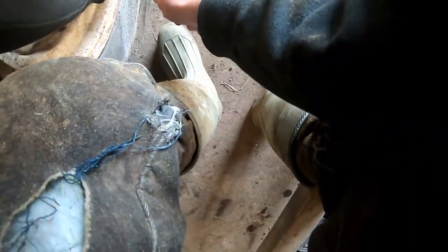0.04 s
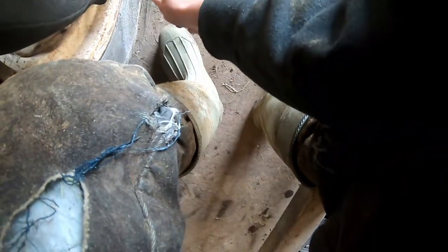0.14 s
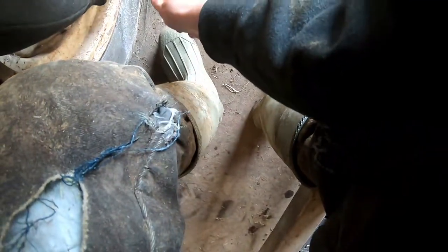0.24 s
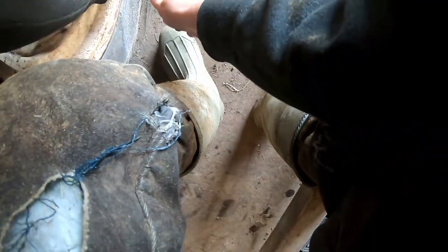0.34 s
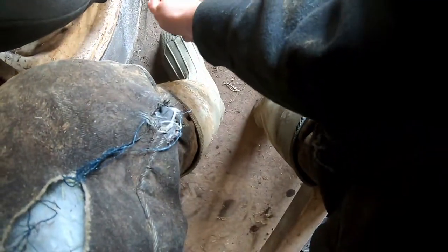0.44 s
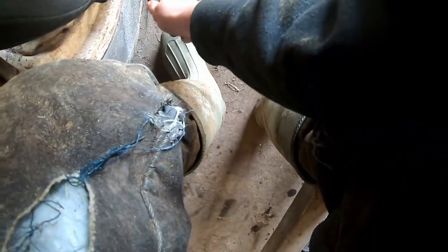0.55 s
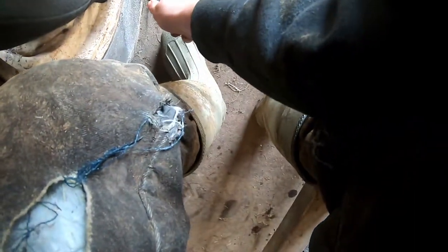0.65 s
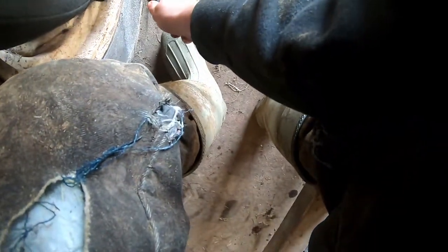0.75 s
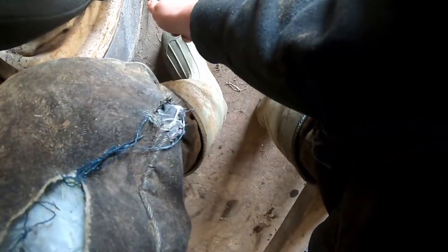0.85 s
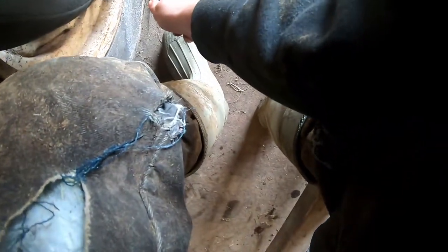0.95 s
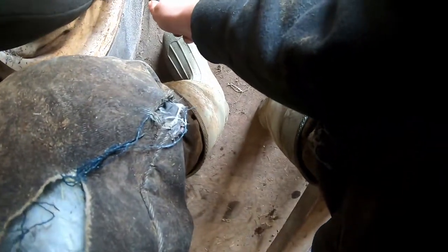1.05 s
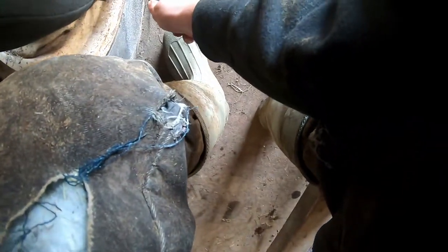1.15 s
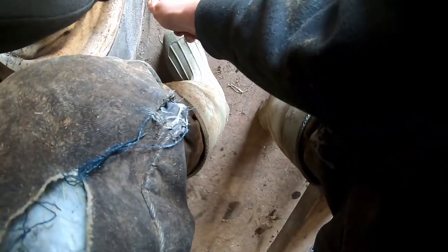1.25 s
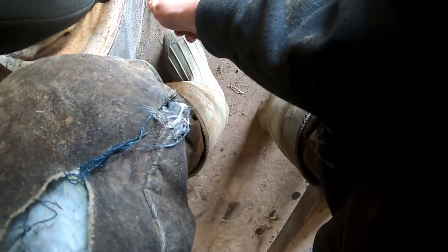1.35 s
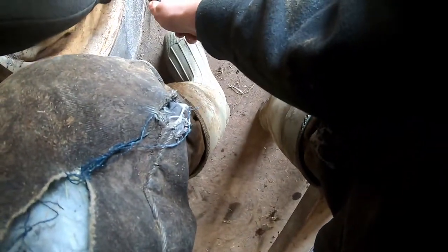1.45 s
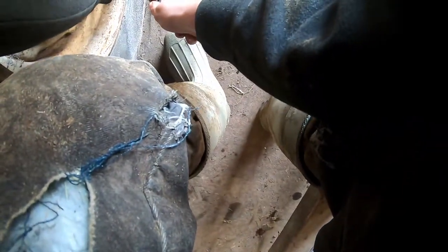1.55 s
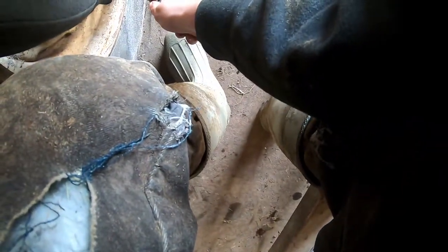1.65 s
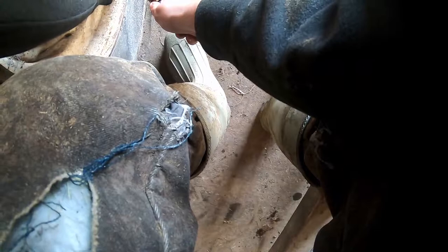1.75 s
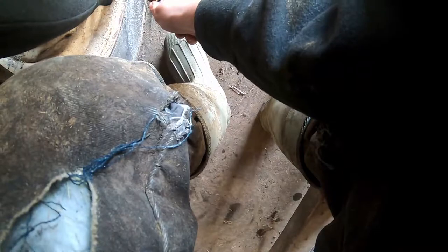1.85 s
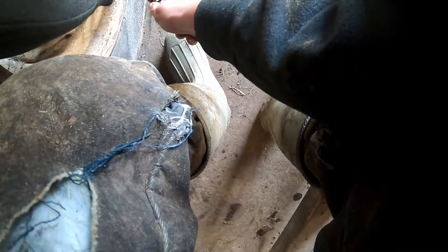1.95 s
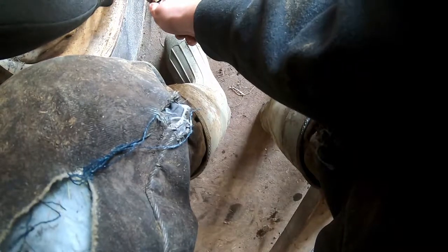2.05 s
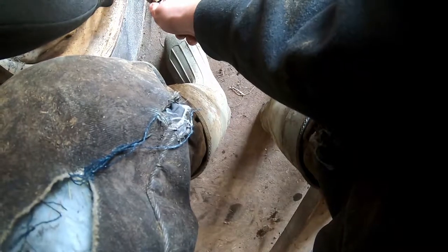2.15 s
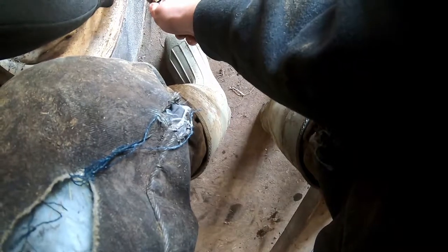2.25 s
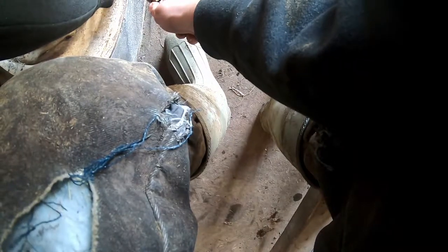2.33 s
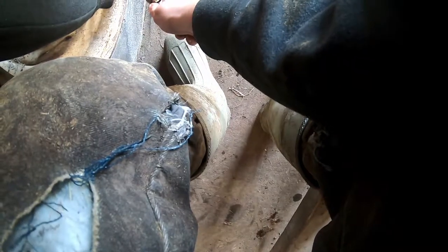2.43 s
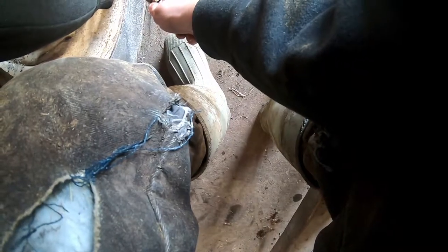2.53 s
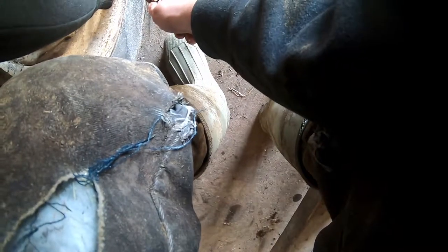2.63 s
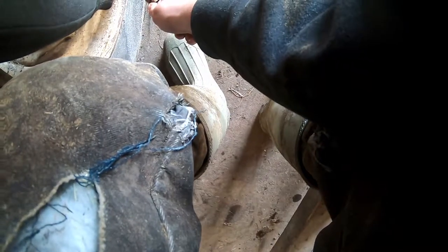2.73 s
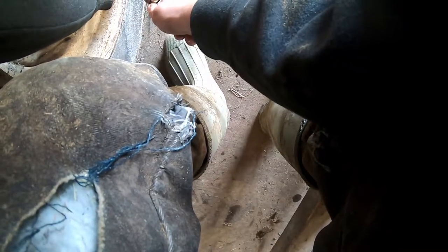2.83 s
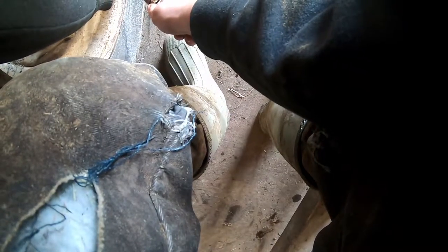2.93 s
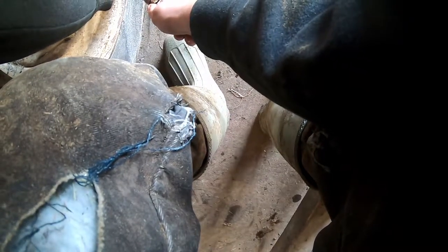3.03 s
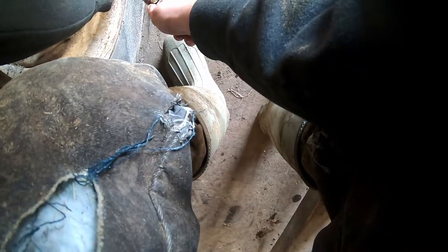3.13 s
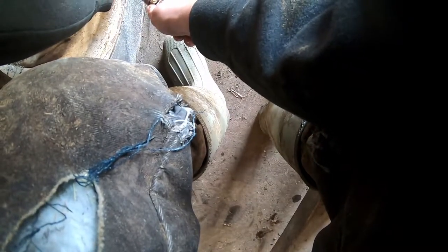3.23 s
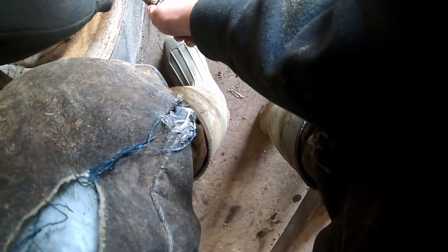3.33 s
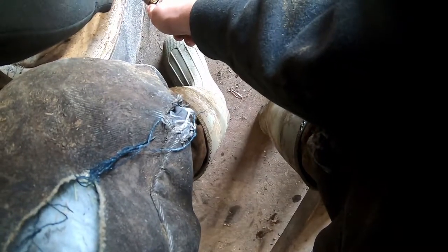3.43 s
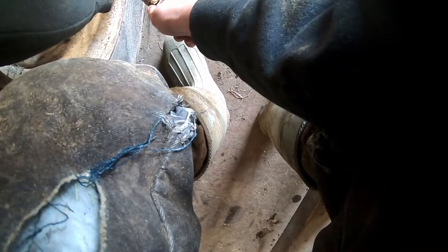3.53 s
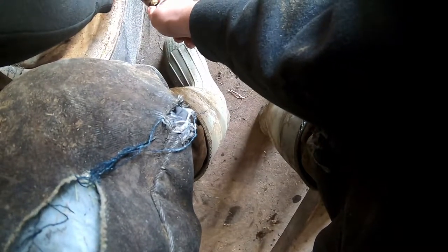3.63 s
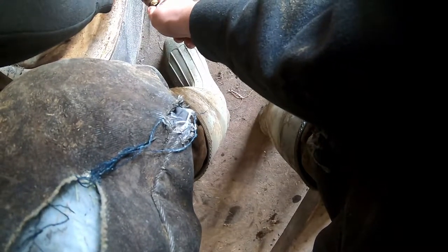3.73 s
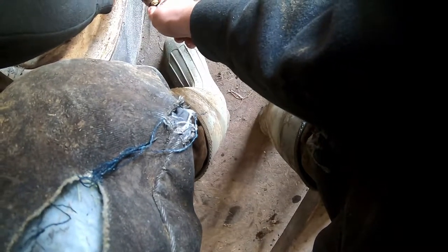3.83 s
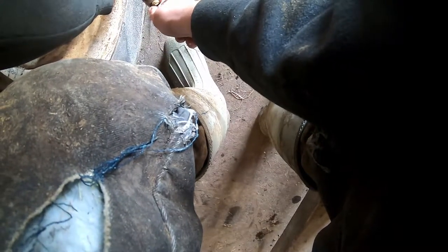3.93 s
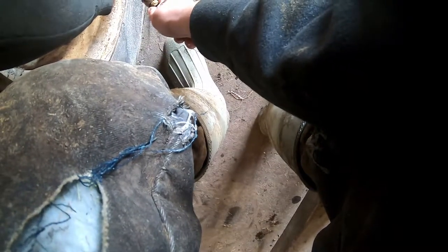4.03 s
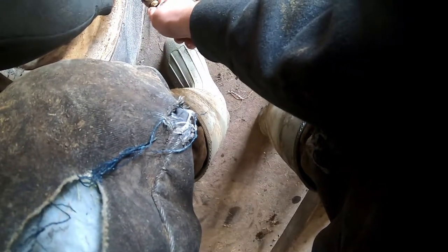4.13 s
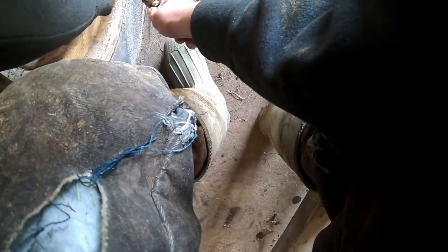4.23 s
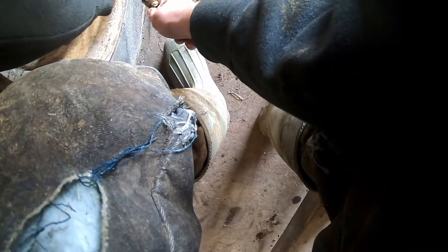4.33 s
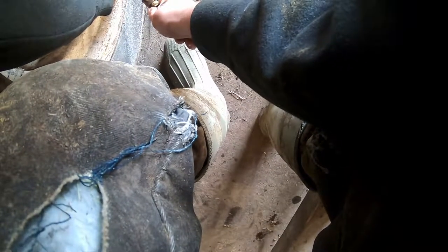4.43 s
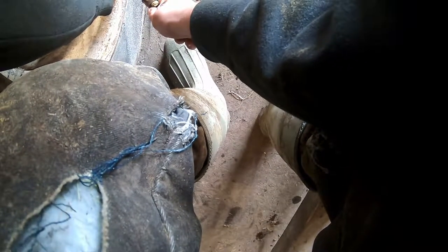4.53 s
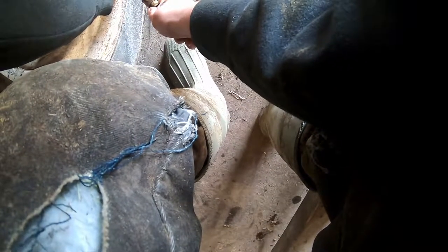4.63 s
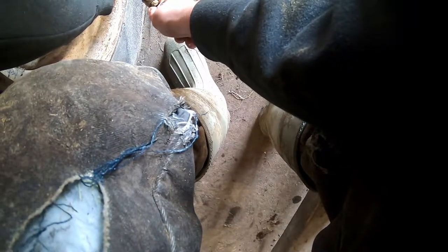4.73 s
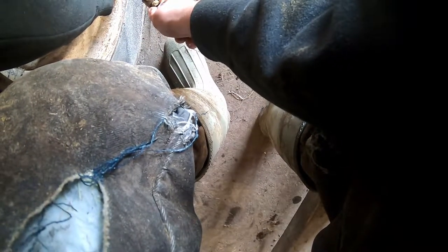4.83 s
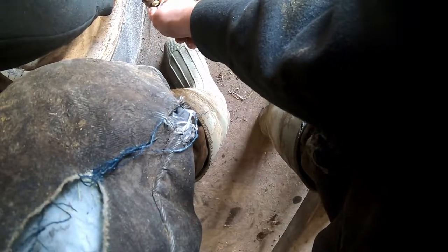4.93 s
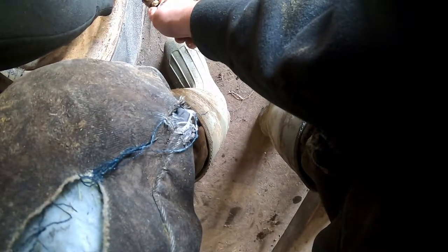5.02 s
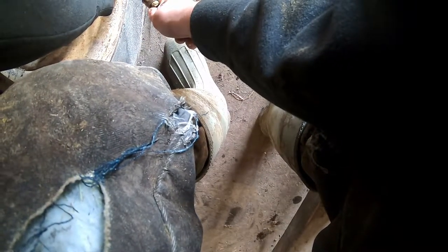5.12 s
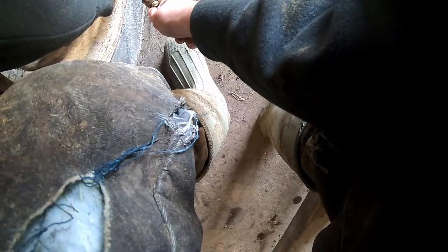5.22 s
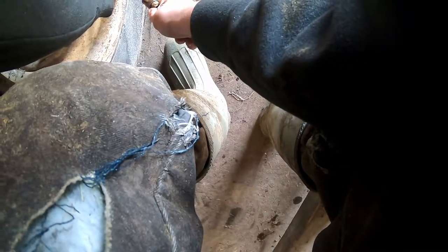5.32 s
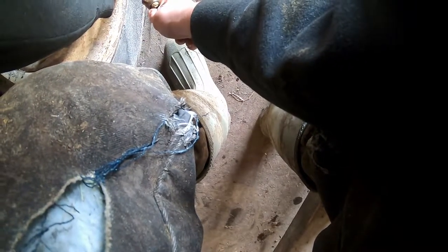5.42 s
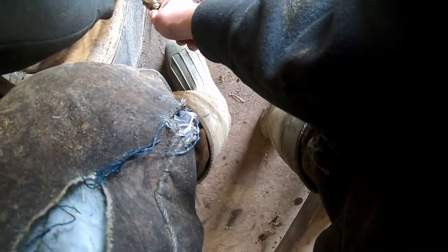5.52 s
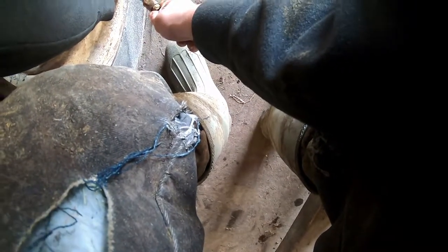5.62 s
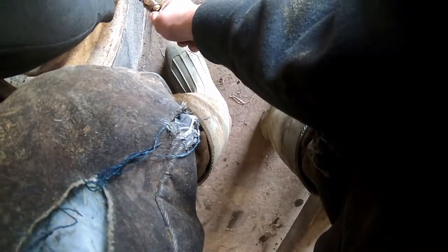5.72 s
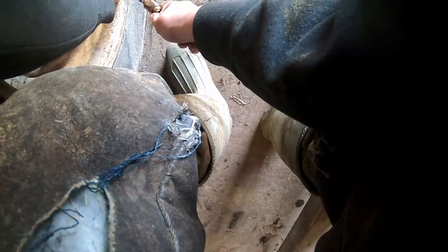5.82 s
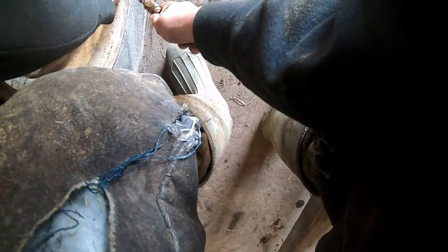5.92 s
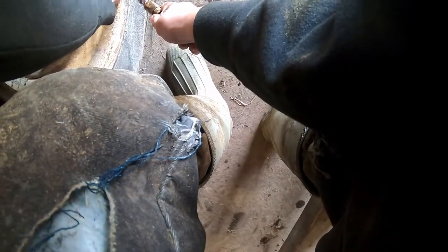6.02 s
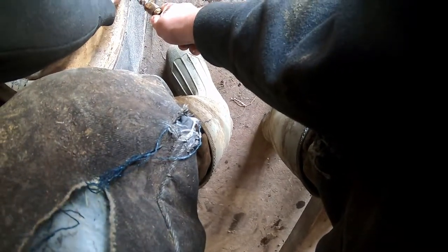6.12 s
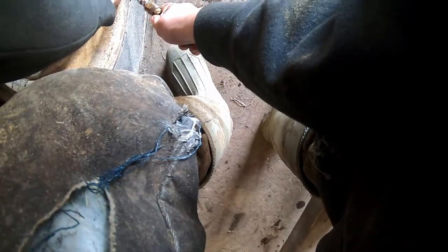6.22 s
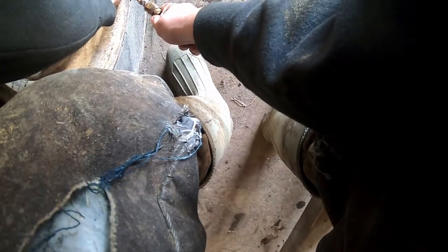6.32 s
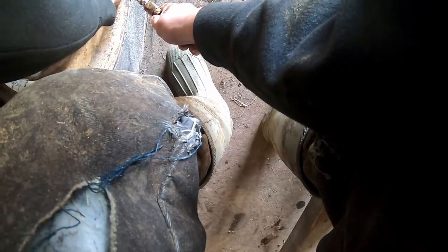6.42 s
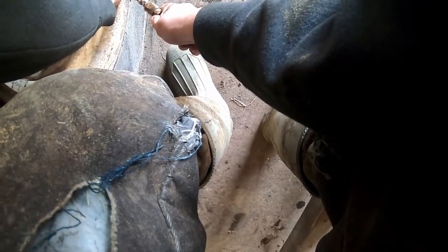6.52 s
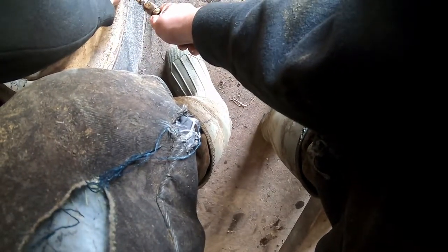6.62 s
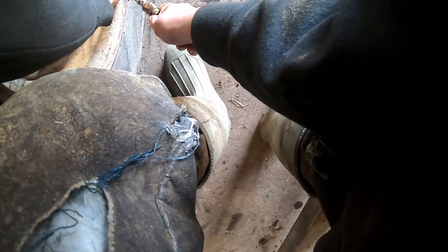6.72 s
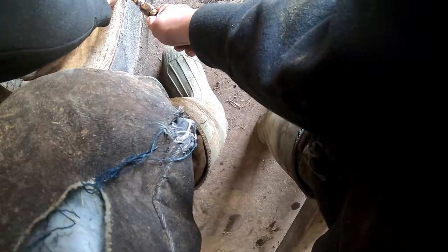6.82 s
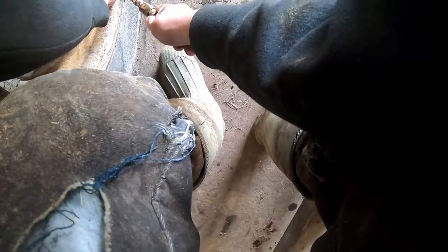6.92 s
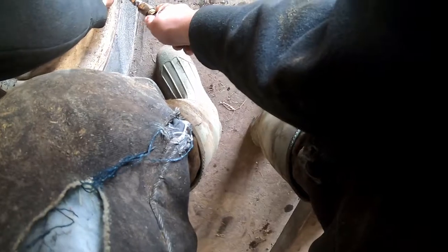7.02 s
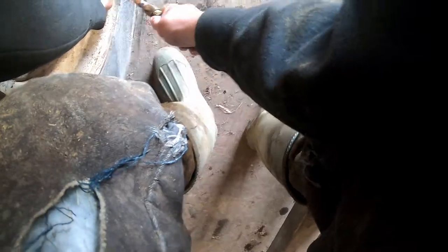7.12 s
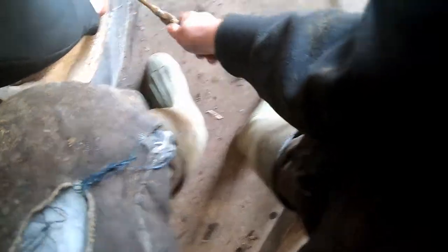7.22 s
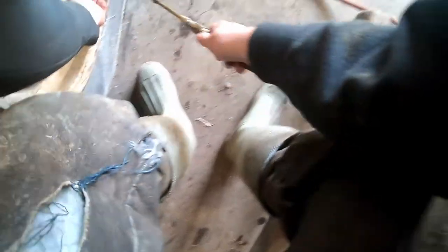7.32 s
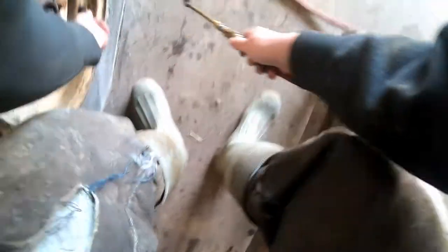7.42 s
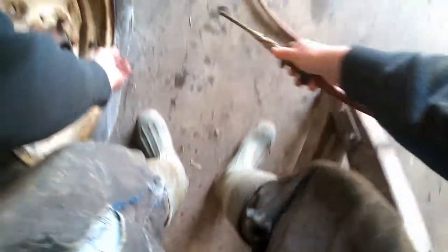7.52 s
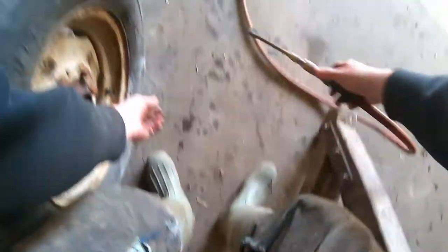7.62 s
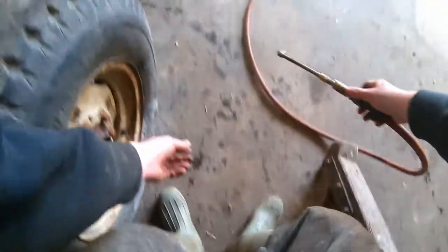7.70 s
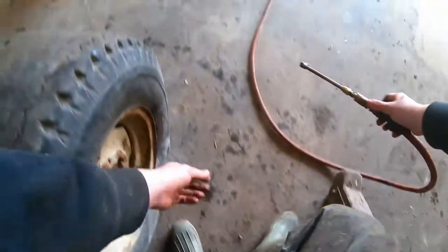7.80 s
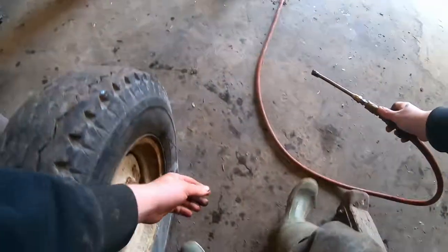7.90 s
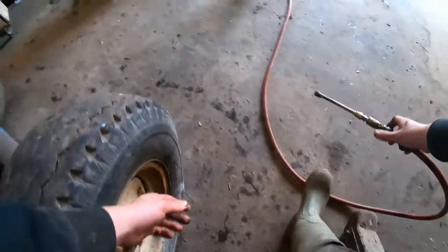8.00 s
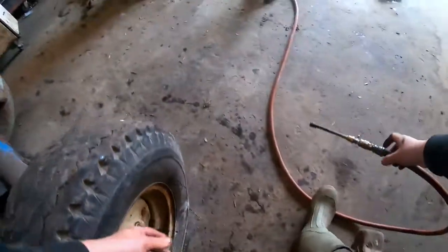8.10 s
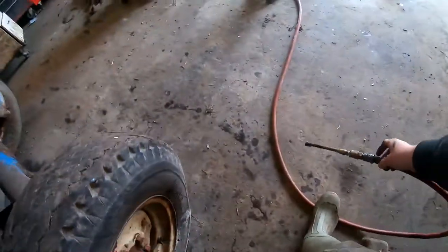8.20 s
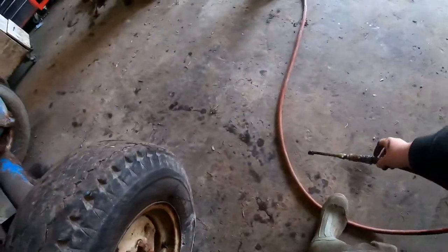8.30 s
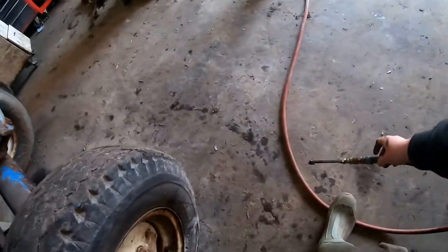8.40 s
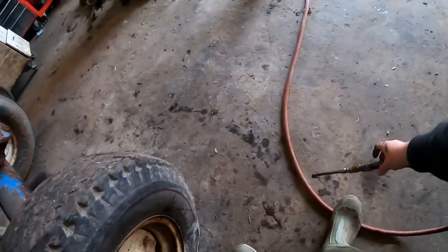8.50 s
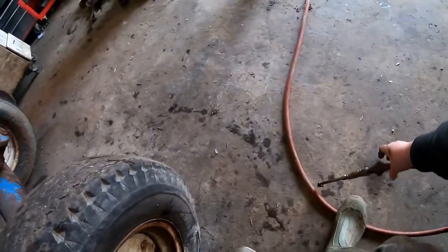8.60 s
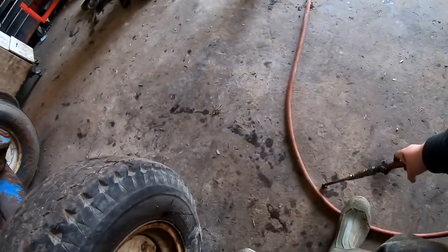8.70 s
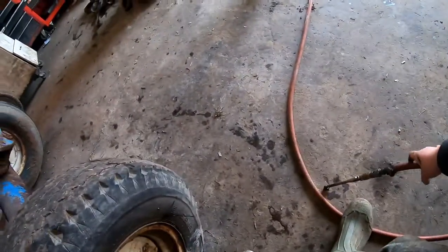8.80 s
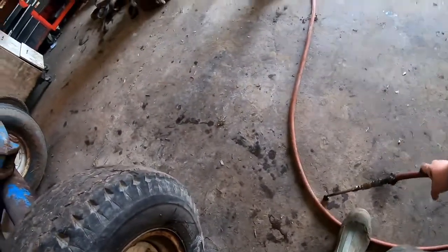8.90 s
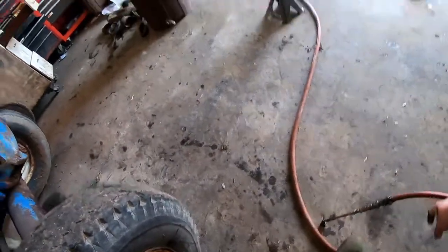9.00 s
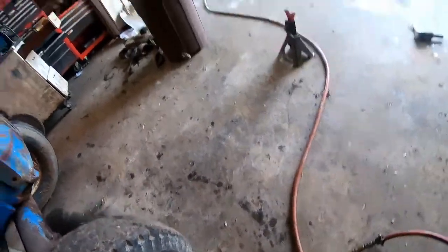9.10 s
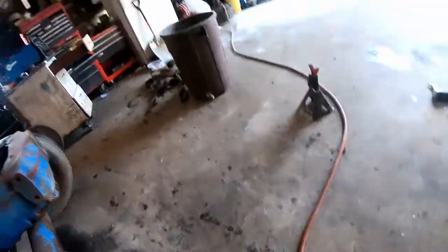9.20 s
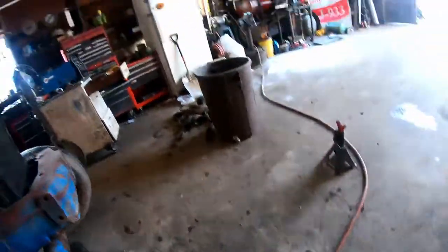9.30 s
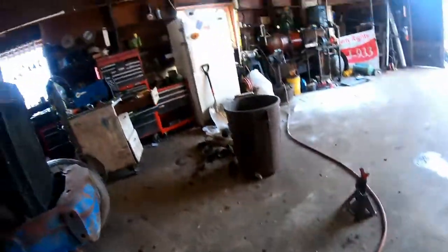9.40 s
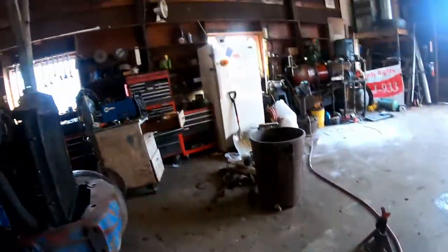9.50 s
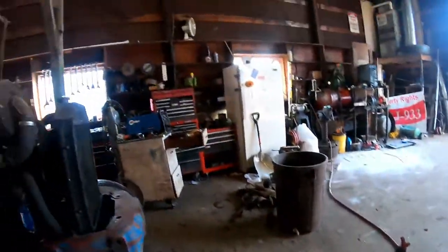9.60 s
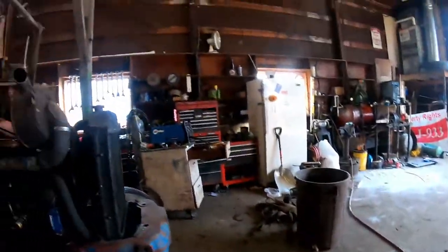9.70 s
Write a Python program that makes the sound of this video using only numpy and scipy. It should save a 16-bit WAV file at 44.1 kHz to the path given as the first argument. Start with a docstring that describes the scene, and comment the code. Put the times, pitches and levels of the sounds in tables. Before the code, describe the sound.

Close, body-worn view in a farm workshop: dull bumps and a weak hiss as an air chuck sits askew on a tyre valve, a tiny rubber squeak, then a harsh spit of air thinning to fizz. A steady hiss fills the tyre, growing slightly louder and brighter. The chuck lifts off with a short blast and low thump, then a dull gasp, a soft leak, scuffs, knocks and hard metallic clicks.

```python
"""Dull bumps and a weak hiss come first, as an air chuck sits askew on a tyre valve in a farm workshop.
The rubber seal squeaks, air spits past it and thins to a fizz, then the chuck seats and the tyre fills.
The steady hiss slowly grows louder and brighter, until the lifting chuck lets out a blast and a thump.
A dull gasp and a soft leak follow, with bumps, scuffs and sharp clicks as the worker stands up.
Air is shaped noise, contacts are short noise bursts or rings, and low room noise lies under it all."""
import sys
import numpy as np
from scipy import signal
from scipy.fft import rfft, irfft
from scipy.io import wavfile
from scipy.ndimage import uniform_filter1d

SR = 44100
rng = np.random.default_rng(int(sys.argv[2]) if len(sys.argv) > 2 else 0)


def unload_wav(signal):
    """Save mono or channel-first audio to the path in sys.argv[1] as 16-bit WAV at rate SR, clipped to [-1, 1]."""
    wavfile.write(
        sys.argv[1],
        SR,
        np.round(np.clip(np.atleast_2d(signal).T, -1, 1) * 32767).astype(np.int16),
    )


N = 429975
TIME = np.arange(N) / SR  # s
FREQ = np.maximum(np.arange(N // 2 + 1) * SR / N, 1)  # Hz

# colour of the workshop background: (pitch [Hz], relative level per Hz [dB])
SHOP_COLOUR = [(22, -33), (40, -3), (75, -10), (130, -2.5), (210, -3.5), (330, -7.5), (600, -12.5),
               (1200, -24), (4000, -35), (15000, -59)]
# level of the background at the moving camera, before a small random drift: (time [s], level [dB])
SHOP_LEVEL = [(0, -49), (2, -54), (6.9, -52.5), (7.6, -57), (8.3, -54.5), (9.0, -58.5), (9.75, -52)]
# deep tones that beat against each other: (pitch [Hz], middle level [dB])
THROB_TONES = [(38.4, -70), (43.7, -65), (47.6, -65)]
# dull bumps of clothes and body on the camera, and a deep burst under the thump at 7.062 s: # (time [s], level
# [dB], pitch [Hz], decay [s])
BODY_BUMPS = [(0, -41.5, 198, 0.031), (.045, -41, 230, 0.019), (.29, -41.5, 239, 0.037),
              (.42, -45, 200, .03), (.91, -48, 287, .07), (3.79, -38, 218, .06), (3.83, -35, 150, 0.089),
              (3.82, -45, 50, 0.13), (6.31, -45, 300, .019), (7.06, -36.5, 148, 0.055),
              (7.062, -32, 50, .02), (7.995, -45.5, 170, 0.044), (8.1, -43.5, 168, 0.023),
              (8.34, -42, 264, 0.046), (8.59, -41, 191, 0.016), (9.285, -47, 520, 0.062)]
# soft knocks on the camera body: (time [s], peak level [dB])
CAMERA_KNOCKS = [(8.108, -35), (8.236, -29), (8.568, -29), (8.658, -30), (8.755, -32), (9.276, -40)]
# gritty scuffs of boots and chuck: (time [s], level [dB], pitch [Hz], decay [s])
GRITTY_SCUFFS = [(.329, -41, 3800, .009), (.443, -37, 6960, .016), (6.317, -32, 6030, .004),
                 (7.148, -36, 5230, .02), (8.327, -34, 3060, 0.0023), (8.325, -44, 3000, 0.037),
                 (8.335, -49, 950, 0.023), (8.563, -40.5, 3360, 0.022), (8.563, -45, 900, .014),
                 (8.587, -36, 2830, 0.0067)]
# double clicks, first the valve pin, then the gear being handled:
# (time [s], peak level [dB], brightest pitch [Hz], rebound delay [s], rebound level [dB],
#  left minus right [dB])
SHARP_CLICKS = [(7.078, -20, 2500, 0.00088, 1, 2), (8.7538, -11.5, 2580, 0.0028, -0.5, -5),
                (9.2794, -13.5, 1630, 0.0017, -16, -5), (9.4466, -17, 6100, 0.0025, -16, -4)]
# what the clicks ring with: (pitch [Hz], time to fall by 60 dB [s], relative level [dB])
GEAR_RINGS = [(486, 0.0074, 9.5), (1140, 0.0075, -2), (1700, 0.0085, -2), (2940, 0.0027, -2.5),
              (4360, 0.0016, -6), (5700, .0025, -10), (7450, 0.0035, -6), (9500, 0.0076, -18)]
# the loose chuck leaking in the hand, before a 0.5 dB lift and random drift: (time [s], level [dB])
LEAK_LEVEL = [(7.5, -52.5), (7.69, -52.5), (8.01, -51.5), (8.25, -48.5), (8.6, -46.5), (9.32, -49),
              (9.48, -49), (9.75, -51)]
# the loose nozzle points toward the camera, then away: (time [s], treble lift [dB])
LEAK_TREBLE = [(7.5, -0.5), (8.15, 4), (9.1, 0.5), (9.4, -1)]
# colours of the four jets of air, before resonances and a bass cut: (pitch [Hz], relative level [dB])
LEAK_COLOUR = [(150, -36), (700, -3), (1400, 1), (2200, -1), (3600, 0.5), (5000, -1), (7500, 1.4),
               (9400, -0.8), (11000, -10.5), (15400, -21)]
BLAST_AIR_COLOUR = [(150, -10), (700, -18), (1800, -10), (2800, -11), (3800, -3.5), (5700, -7), (7500, 1.5),
                    (8700, -4), (9800, -5.5), (11500, -19), (15400, -23)]
SPIT_AIR_COLOUR = [(150, -21), (1000, -23.5), (3400, -12), (3900, -6), (4400, -13.5), (5200, -1.5),
                   (6100, -1.5), (6800, -7), (7600, 1.5), (8600, -13.5), (9500, 0), (10800, -18.5),
                   (15400, -26)]
FILL_AIR_COLOUR = [(150, -27), (600, -16), (900, -15), (1400, -5.5), (2400, -3), (4200, -6.5), (5600, -4.5),
                   (6400, -1), (8000, -2.5), (10000, -6.5), (10700, -18.5), (13000, -18), (15400, -26.5)]
# resonances of the open chuck tube: (pitch [Hz], width [Hz], lift [dB])
TUBE_RESONANCES = [(1470, 220, 1.5), (2190, 350, 3), (3430, 820, 3), (4300, 250, 1), (9340, 470, 5.5)]
# resonances and cancellations (negative lift) of the gap at the seal: (pitch [Hz], width [Hz], lift [dB])
SEAL_RESONANCES = [(3520, 200, -10), (3950, 250, 3), (4800, 300, 2.5), (6400, 200, -4), (8200, 300, 0),
                   (9100, 300, 2.5), (10100, 250, -9)]
# resonances of stem, chuck and wheel rim, and cancellations: (pitch [Hz], width [Hz], lift [dB])
STEM_RESONANCES = [(1220, 82, 5), (1630, 330, 6), (1970, 190, 5), (3024, 135, 6.5), (3940, 260, 4),
                   (4760, 770, 5), (5440, 150, -3), (6650, 300, 2), (7150, 250, 2.5), (7850, 220, -3),
                   (8900, 390, 2.5)]
# how the two microphone ports hear the loose chuck and the valve, before reflections:
# (pitch [Hz], left minus right [dB], shared part [0-1], left phase lead [rad])
PORTS_AT_HAND = [(300, -2.0, 0.96, -0.1), (1100, -0.7, 0.31, 0.19), (2000, -2.6, 0.55, 0.5),
                 (3500, 1.3, 0.97, -0.02), (6000, -2.2, 0.65, -0.23), (7800, -7.4, 0.42, -1.56),
                 (9500, 5.2, 0.57, -1.82), (11000, -5.6, 0.07, -1.8), (15000, 3.8, 0.08, 1.26)]
PORTS_AT_VALVE = [(300.0, -2.3, 0.9, 0.02), (800.0, 3.3, 0.33, 1.05), (1100.0, 11.7, 0.16, -1.37),
                  (1600.0, 14.2, 0.76, 0.32), (2500.0, 9.9, 0.52, -1.22), (4200.0, 5.7, 0.69, 0.09),
                  (5150.0, -1.0, 0.79, 1.5), (5470.0, 2.5, 0.6, 3.04), (5950.0, 4.5, 0.64, 1.3),
                  (6850.0, -0.7, 0.82, 1.48), (7550.0, -2.9, 0.7, 2.8), (9300.0, 4.0, 0.75, 3.13),
                  (10700.0, 1.7, 0.0, 2.33), (14500.0, 7.7, 0.24, 2.99)]

TOP_HZ = 15800
# when the throb comes and goes
THROB_START_S, THROB_END_S, THROB_FADE_S = 1.3, 9.2, 0.25
# the knocks share one pitch and length
KNOCK_HZ, KNOCK_RISE_S, KNOCK_DECAY_S = 187, 0.0014, 0.0024
# a rub's rise time as a share of its decay time
RUB_RISE = 0.21
LEAK_ATTACK_S = 0.05
# when the chuck is pressed home, when it starts to lift off, and when the valve snaps shut
SEATED_S, LIFT_S, RELEASE_S = 1.17, 6.95, 7.081
# the chuck tilts and air spits past the seal, which seeps until it is seated and then fades
SPIT_START_S, SPIT_END_S, SPIT_ATTACK_S, SPIT_RELEASE_S = 0.556, 1.038, 0.038, 0.019
SPIT_DB, SEEP_DB, SEEP_RELEASE_S = -31.5, -45, 0.28  # levels before a treble cut
# the spit swells for a moment as the chuck rocks back
ROCK_S, ROCK_RISE_S, ROCK_DECAY_S, ROCK_DB = 0.962, 0.015, 0.025, -34  # level before a treble cut
# the closing gap squeezes the spit into a high fizz and drives a surge down the stem
SQUEEZE_S, SQUEEZE_RISE_S = 1.027, 0.033
FIZZ_DB, FIZZ_DECAY_S = -27, 0.23  # level before the low part is taken away
SURGE_DB, SURGE_DECAY_S = -44.5, 0.069
# the stream through the stem: weak while askew, full once seated, creeping up as the tyre fills
# its levels, like those of the surge and gasp, are for the 1200-2600 Hz part before treble and drift
ASKEW_DB, SEATED_DB, CREEP_DB_PER_S = -44.5, -39.6, 0.1849
SEATING_S, SHUT_S = 0.16, 0.0044
# its treble lift when seated, and how that grows with the pressure
TREBLE_DB, TREBLE_DB_PER_S = -1.37, 0.5639
# a last gasp from the stem as the chuck slides away, growing duller
GASP_START_S, GASP_END_S, GASP_ATTACK_S, GASP_RELEASE_S = 7.085, 7.365, 0.09, 0.06
GASP_DB, GASP_TREBLE_DB, GASP_DULLING_DB_PER_S = -48, 4, 17


def undb(db):
    """Turn decibels into a gain."""
    return 10 ** (np.asarray(db) / 20)


def curve(rows):
    """Join rows of (time, value) by straight lines."""
    return np.interp(TIME, *np.transpose(rows))


def across(rows):
    """Join the columns of a table that starts with pitch, on a log-pitch axis."""
    hz, *columns = np.transpose(rows)
    return np.array([np.interp(np.log(FREQ), np.log(hz), column) for column in columns])


def noise():
    """Make the spectrum of fresh white noise."""
    return rfft(rng.standard_normal(N))


def unit(x):
    """Scale a stereo sound so that the average of its two sides has a standard deviation of 1."""
    return x / np.std(x.mean(axis=0))


def band(x, lo_hz, hi_hz, order=2):
    """Keep only the pitches between two limits."""
    sos = signal.butter(order, [lo_hz, hi_hz], "band", fs=SR, output="sos")
    return signal.sosfilt(sos, x)


def walk(rate):
    """Drift between random levels, each held 1 / rate seconds, then smoothed twice; spread 1."""
    hold_samples = int(SR / rate)
    steps = np.repeat(rng.standard_normal(N // hold_samples + 1), hold_samples)
    smooth = uniform_filter1d(uniform_filter1d(steps, hold_samples), hold_samples)[:N]
    return smooth / smooth.std()


def hold(start_s, end_s, attack_s, release_s):
    """Shape a level: a straight attack, a hold, then a fade to 37 % in each release time."""
    attack = np.clip((TIME - start_s) / attack_s, 0, 1)
    return attack * np.exp(-np.maximum(TIME - end_s, 0) / release_s)


def swell(s, rise_s, decay_s):
    """Shape a level that grows to a peak and dies away, both exponentially."""
    return np.exp(-np.maximum((s - TIME) / rise_s, (TIME - s) / decay_s))


def swing(s, db, hz, rise_s, decay_s):
    """Make a short burst of pressure swings at one pitch."""
    return -undb(db) * swell(s, rise_s, decay_s) * np.cos(2 * np.pi * hz * (TIME - s))


def treble(x, corner_hz):
    """Keep the part of a sound above a corner."""
    return irfft(rfft(x) / (1 + (corner_hz / FREQ) ** 6), N)


def brighten(x, lift_db, corner_hz):
    """Raise (or, if negative, lower) everything above a corner by a steady or moving amount."""
    return x + treble(x, corner_hz) * (undb(lift_db) - 1)


def reflections(db, span_s, count=12):
    """Short echoes off wheel, floor and legs ripple the spectrum at one port."""
    echo = np.zeros(N)
    lag = rng.uniform(0, 1, count)
    size = rng.standard_normal(count)
    delay_s = 0.002 + span_s * lag
    echo[(delay_s * SR).astype(int)] = undb(db) * size / np.linalg.norm(size)
    return 1 + rfft(echo)


def jet(colour, ports, resonances=()):
    """Turbulent air excites resonances; the ports share a direct part and each gets a diffuse part."""
    db = across(colour)[0]
    for hz, width_hz, lift_db in resonances:
        db = db + lift_db / (1 + (2 * (FREQ - hz) / width_hz) ** 2)
    pan_db, shared, lead = across(ports)
    shared = np.clip(shared, 0, 1)
    direct = noise() * np.sqrt(shared)
    out = []
    for side in (1, -1):  # left, right
        diffuse = noise() * np.sqrt(1 - shared)
        heard = direct * np.exp(0.5j * side * lead) + diffuse
        share = 1 / np.sqrt(1 + undb(-2 * side * pan_db))
        out.append(heard * share * reflections(db=-12, span_s=0.012))
    # a small nozzle radiates no bass
    bass_cut = FREQ ** 2 / (FREQ ** 2 + 110 ** 2)
    return irfft(np.array(out) * undb(db) * bass_cut, N)


def rubs(rows, spread, grain, apart, order):
    """Dense friction grains around a pitch make short bursts, each swelling and dying away."""
    out = np.zeros((2, N + SR))
    t = TIME[:SR // 2]
    ratio = 1 + spread
    for s, db, hz, decay_s in rows:
        mid, side, size = rng.standard_normal((3, len(t)))
        grains = (mid + apart * np.array([side, -side])) * np.exp(grain * size)
        burst = unit(band(grains, hz / ratio, hz * ratio, order))
        shape = (1 - np.exp(-t / (RUB_RISE * decay_s))) ** 2 * np.exp(-t / decay_s)
        start = int(s * SR)
        out[:, start:start + len(t)] += burst * undb(db) * shape / shape.max()
    return out[:, :N]


def workshop(apart=0.27, bass_apart=0.44):
    """Low murky noise, less alike at the ports in treble and deep bass, lies over an uneven throb."""
    colour = undb(across(SHOP_COLOUR)[0])
    mid = irfft(noise() * colour, N)
    difference = apart * FREQ / 300 + bass_apart / (1 + (FREQ / 100) ** 4)
    side = irfft(noise() * colour * np.minimum(difference, 1), N)
    murmur = unit(np.array([mid + side, mid - side])) * undb(curve(SHOP_LEVEL) + walk(4.66))
    throb = 0
    for hz, db in THROB_TONES:
        level = undb(db + 4 * walk(9.8)) * np.sqrt(2)
        throb = throb + level * np.sin(2 * np.pi * hz * TIME + 1.1 * walk(4.4))
    return murmur + throb * hold(THROB_START_S, THROB_END_S, THROB_FADE_S, THROB_FADE_S)


def room(x, wet_db, t60):
    """The cluttered shed scatters sound into a faint tail that falls by 60 dB in t60 seconds."""
    t = TIME[:SR]
    tail = band(rng.standard_normal((2, SR)), 200, 4600, order=1)
    tail = tail * np.exp(-np.log(1000) * t / t60) * (1 - np.exp(-t / 0.022))
    tail = tail / np.linalg.norm(tail[0])
    return undb(wet_db) * signal.fftconvolve(x, tail, axes=1)[:, :N]


def bumps():
    """Clothes and body press on the camera in dull, low bursts of noise; one deep burst fills out the thump."""
    return rubs(BODY_BUMPS, spread=0.6, grain=0.33, apart=0.094, order=2)


def knocks():
    """Soft contacts set the camera body swinging very briefly at one low pitch."""
    return sum(swing(s, db, KNOCK_HZ, KNOCK_RISE_S, KNOCK_DECAY_S) for s, db in CAMERA_KNOCKS)


def scuffs():
    """Boots and chuck scrape in short, gritty bursts of friction noise."""
    return rubs(GRITTY_SCUFFS, spread=0.49, grain=0.5, apart=0.29, order=3)


def clicks(slope_db=9.0, rattle=0.21, rattle_s=0.0028, crack=1.0):
    """A hard contact, a tiny rattle and one rebound crack and ring the same short modes."""
    out = np.zeros((2, N))
    t = TIME[:SR // 20]
    for s, db, bright_hz, rebound_s, rebound_db, pan_db in SHARP_CLICKS:
        push = rattle * rng.standard_normal((2, len(t))) * np.exp(-t / rattle_s)
        push[:, 0] += 1
        push[:, int(rebound_s * SR)] += undb(rebound_db)
        ring = 0
        for hz, t60, mode_db in GEAR_RINGS:
            # modes far from the brightest pitch ring more weakly
            octaves_off = abs(np.log2(hz / bright_hz))
            level = undb(mode_db - slope_db * octaves_off)
            ring = ring + level * np.exp(-np.log(1000) * t / t60) * np.cos(2 * np.pi * hz * t)
        ringing = signal.fftconvolve(push, ring[None])[:, :len(t)]
        click = band(ringing + crack * push, 300, 9800, order=5)
        click = click / abs(click.mean(axis=0)).max()
        side_db = np.array([[pan_db], [-pan_db]]) / 2
        start = int(s * SR)
        out[:, start:start + len(t)] += click * undb(db + side_db)
    return out


def squeak():
    """The rubber seal chirps once as the chuck shifts on the valve."""
    return swing(0.339, db=-31, hz=3800, rise_s=0.003, decay_s=0.005)


def loose_chuck():
    """Air leaks thinly through the open tube of the chuck in the hand, once it is off the valve."""
    air = unit(jet(LEAK_COLOUR, PORTS_AT_HAND, TUBE_RESONANCES))
    air = brighten(air, curve(LEAK_TREBLE), corner_hz=4760)
    free = np.clip((TIME - RELEASE_S) / LEAK_ATTACK_S, 0, 1)
    return air * free * undb(curve(LEAK_LEVEL) + 0.5 + 0.56 * walk(8.9))


def thump():
    """The last puff of air strikes the microphone, with a hollow pop from the chuck's mouth."""
    puff = swing(RELEASE_S, db=-8.5, hz=190, rise_s=0.0026, decay_s=0.0036)
    high_pop = swing(RELEASE_S, db=-24.5, hz=690, rise_s=0.004, decay_s=0.0018)
    low_pop = swing(RELEASE_S, db=-30, hz=436, rise_s=0.0054, decay_s=0.0056)
    return puff + high_pop + low_pop


def blast(db=-19.5, thin_db=6.5):
    """The lifting chuck opens a gap: the blast grows and fills out, and stops as the valve shuts."""
    gap = np.clip((TIME - LIFT_S) / (RELEASE_S - LIFT_S), 0, 1)
    valve_open = np.clip((RELEASE_S - TIME) / SHUT_S + 0.5, 0, 1)
    air = unit(jet(BLAST_AIR_COLOUR, PORTS_AT_VALVE))
    air = brighten(air, thin_db * (1 - gap), corner_hz=3400)
    flutter_db = 0.45 * walk(250)
    return air * gap * valve_open * undb(db + flutter_db)


def escaping():
    """Air seeps, then spits past the tilted rubber seal, and thins to a fizz as the gap closes."""
    air = unit(jet(SPIT_AIR_COLOUR, PORTS_AT_VALVE, SEAL_RESONANCES))
    seep = undb(SEEP_DB) * np.exp(-np.maximum(TIME - SEATED_S, 0) / SEEP_RELEASE_S)
    spit = undb(SPIT_DB) * hold(SPIT_START_S, SPIT_END_S, SPIT_ATTACK_S, SPIT_RELEASE_S)
    rock = undb(ROCK_DB) * swell(ROCK_S, ROCK_RISE_S, ROCK_DECAY_S)
    fizz = undb(FIZZ_DB) * swell(SQUEEZE_S, SQUEEZE_RISE_S, FIZZ_DECAY_S)
    body = brighten(air, lift_db=-4, corner_hz=9150)
    high = treble(air, corner_hz=9150)
    return (body * (seep + spit + rock) + high * fizz) * undb(0.5 * walk(60.4))


def filling():
    """Air streams through the stem, louder and brighter with the pressure; a dull gasp follows."""
    air = jet(FILL_AIR_COLOUR, PORTS_AT_VALVE, STEM_RESONANCES)
    air = air / np.std(band(air.mean(axis=0), 1200, 2600, order=4))
    filled_s = np.maximum(TIME - SEATED_S, 0)
    askew = undb(ASKEW_DB) * np.clip(1 - filled_s / SEATING_S, 0, 1)
    surge = undb(SURGE_DB) * swell(SQUEEZE_S, SQUEEZE_RISE_S, SURGE_DECAY_S)
    seated = undb(SEATED_DB + CREEP_DB_PER_S * filled_s)
    seated = seated * hold(SEATED_S, RELEASE_S, SEATING_S, SHUT_S)
    gasp = undb(GASP_DB) * hold(GASP_START_S, GASP_END_S, GASP_ATTACK_S, GASP_RELEASE_S)
    fill_lift_db = TREBLE_DB + TREBLE_DB_PER_S * filled_s
    gasp_lift_db = GASP_TREBLE_DB - GASP_DULLING_DB_PER_S * (TIME - RELEASE_S)
    lift_db = np.where(TIME < RELEASE_S, fill_lift_db, gasp_lift_db)
    air = brighten(air, lift_db + 0.31 * walk(14), corner_hz=3160)
    return air * (askew + surge + seated + gasp) * undb(0.39 * walk(30))


def scene():
    """Air, squeak, scuffs and clicks sound in the shed; bumps, knocks and puff reach only the camera."""
    airborne = scuffs() + clicks() + squeak() + loose_chuck() + blast() + escaping() + filling()
    echoes = room(airborne, wet_db=-22.5, t60=0.53)
    at_camera = bumps() + knocks() + thump()
    return workshop() + echoes + at_camera + airborne


def record(dry):
    """The camera cuts the top steeply."""
    sos = signal.ellip(10, 0.2, 75, TOP_HZ, fs=SR, output="sos")
    return signal.sosfilt(sos, dry)


dry = scene()
out = record(dry)
unload_wav(out)
```